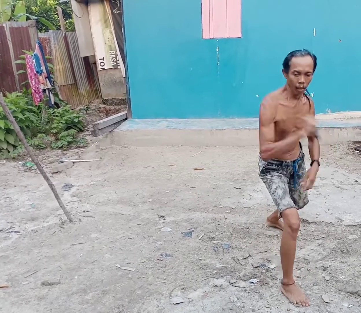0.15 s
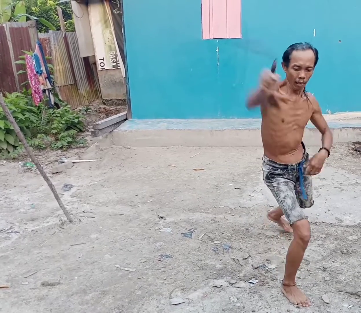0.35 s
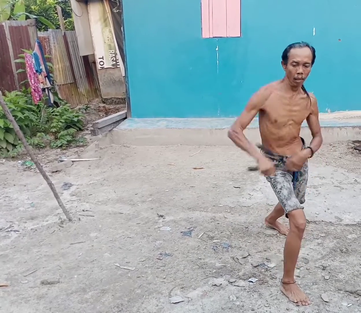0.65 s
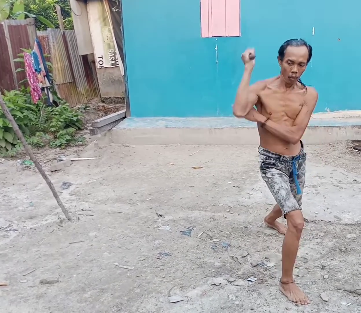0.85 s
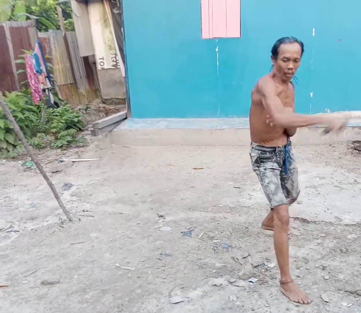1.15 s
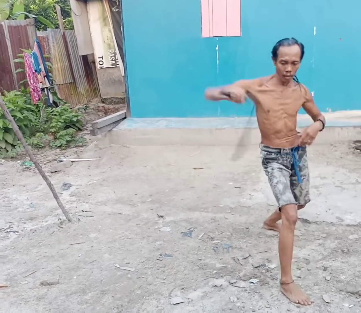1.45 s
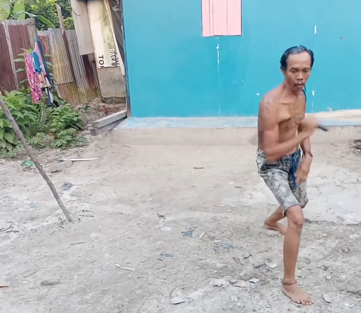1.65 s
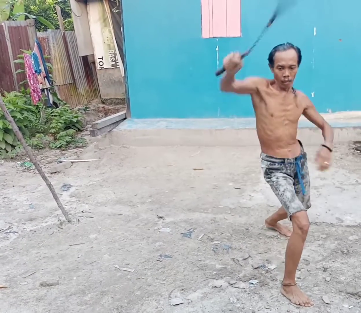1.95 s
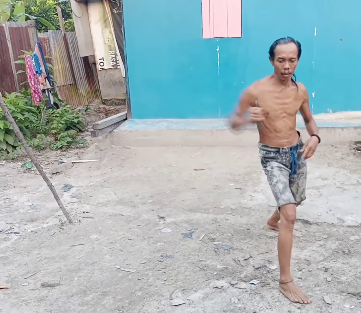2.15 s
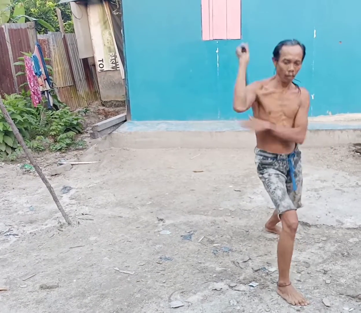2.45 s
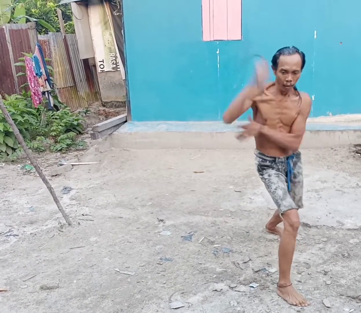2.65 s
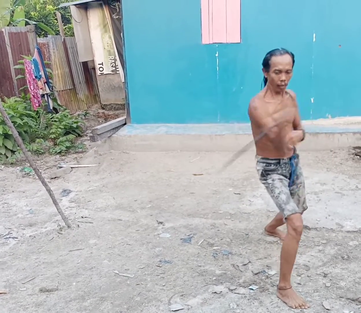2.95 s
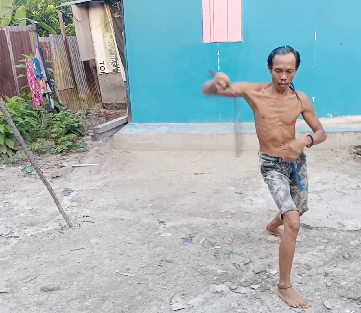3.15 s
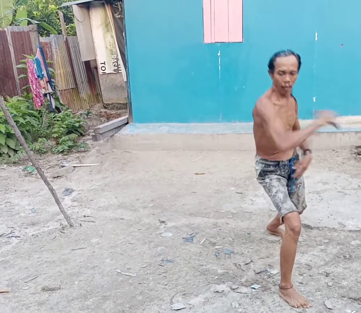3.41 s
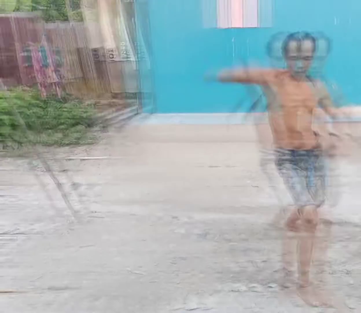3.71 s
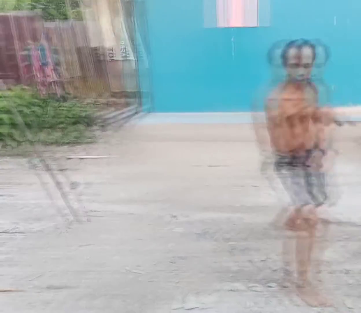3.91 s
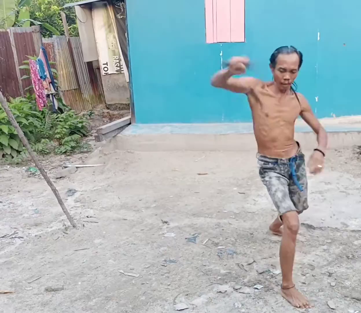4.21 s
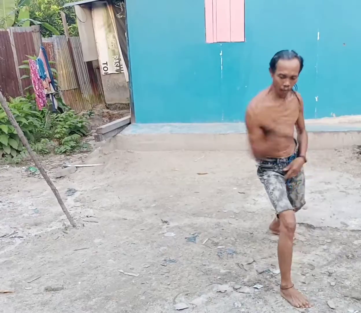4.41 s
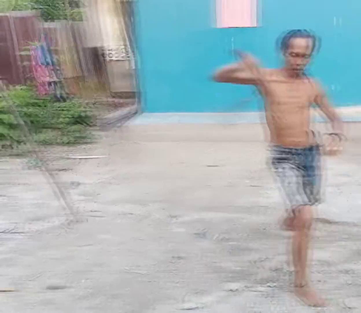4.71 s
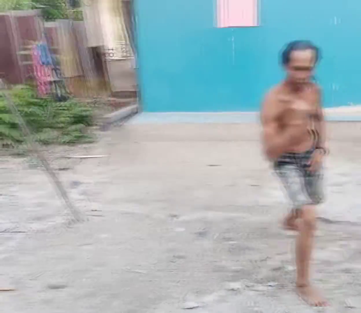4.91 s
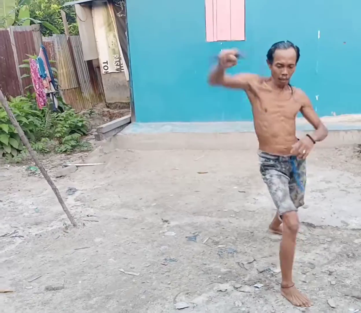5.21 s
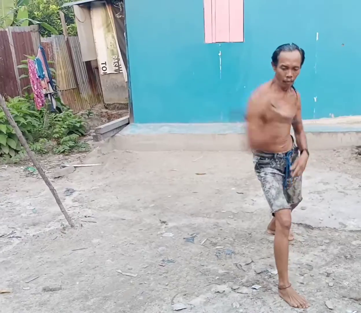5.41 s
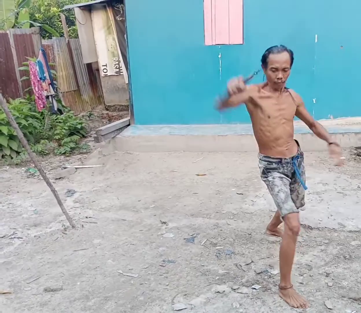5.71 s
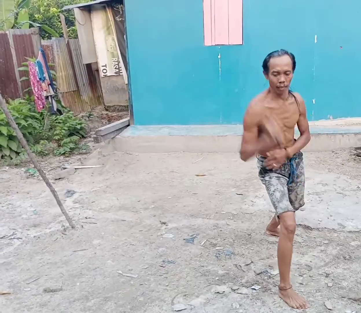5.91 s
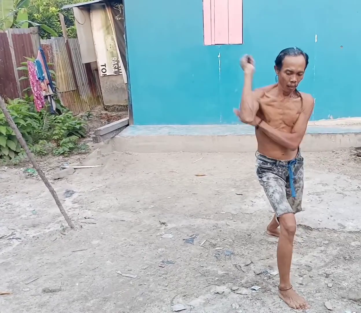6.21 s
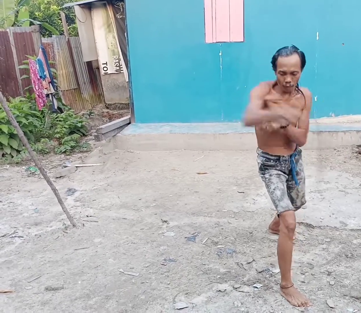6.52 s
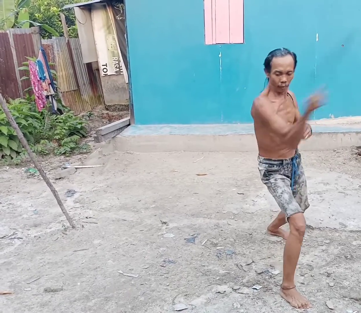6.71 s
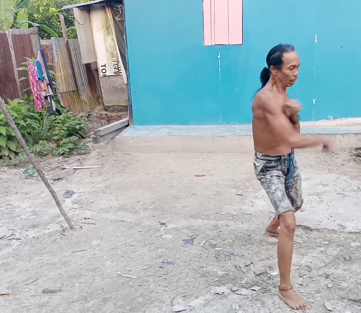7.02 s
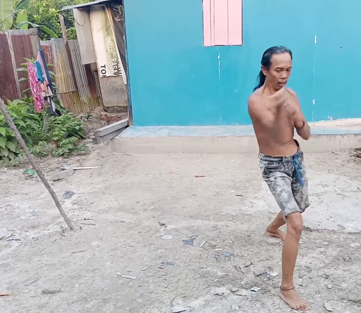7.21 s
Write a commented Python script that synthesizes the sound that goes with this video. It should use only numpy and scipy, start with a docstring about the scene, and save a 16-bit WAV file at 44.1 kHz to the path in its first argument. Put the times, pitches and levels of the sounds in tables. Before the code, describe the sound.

A pair of hollow sticks joined by a chain is swung rapidly in an open yard, a few steps from a mono phone microphone. Short bright rattles of metal links and dry clacks come in irregular bursts, with dull slaps when skin catches a stick. Moderate at first, they grow denser and sharper after four seconds, peak near six, then fade. A nearby wall adds a short diffuse tail over faint traffic hum.

```python
"""Chained sticks swung in a yard

Two hollow sticks joined by a chain are swung in an open yard, a few steps from a mono phone microphone.
Each jerk of the chain is a short run of link collisions that rings the links, their overtones and the sticks.
Pings are dying sines at stick or link pitches, and the sticks slap skin when caught.
A house wall answers with a diffuse tail, and far traffic hums under the hiss of the yard: both are shaped noise."""
import sys
import numpy as np
from scipy import signal
from scipy.fft import rfft, irfft
from scipy.io import wavfile
from scipy.ndimage import uniform_filter1d

SR = 44100
rng = np.random.default_rng(int(sys.argv[2]) if len(sys.argv) > 2 else 0)


def boost(x):
    """Linear amplitude factor 10**(x/20) for a level x in decibels (scalar or array-like)."""
    u = np.asarray(x, float) / 20
    return 10 ** u


def store_wav(level_fs):
    """Save 16-bit WAV to argv[1]."""
    pcm = np.round(np.clip(np.atleast_2d(level_fs), -1, 1) * 32767)
    wavfile.write(sys.argv[1], SR, pcm.T.astype(np.int16))


N = 324576  # length of the scene in samples

# Resonances of the hollow sticks: f/Hz, width/Hz, relative level/dB
STICK_MODES = [(1000, 920, -4.5), (1640, 113, 4), (1750, 910, -6), (1850, 120, -4), (2280, 210, -3.5),
               (2520, 153, -2.5), (2814, 86, -16), (3100, 2900, -4.5), (3350, 130, -1.5), (3603, 150, -1.5),
               (3954, 330, -1), (4190, 320, -7.5)]
# Resonances of the chain links: f/Hz, width/Hz, relative level/dB
LINK_MODES = [(5110, 180, -8.5), (6990, 390, -4.5), (7720, 170, -0.5), (8100, 170, 0), (8260, 114, 0.5),
              (8640, 150, -6.5), (6370, 1700, -13.5), (7360, 270, -4.5), (8100, 970, -8.5),
              (8580, 260, -6.5), (9140, 570, -11)]
# Higher resonances of the links: f/Hz, width/Hz, relative level/dB
OVERTONE_MODES = [(10350, 1300, -1), (11750, 620, 2), (12500, 500, -12), (12100, 4000, -7),
                  (14400, 260, -9), (14800, 1700, 9.5)]


def unit(x):
    """Scales a sound to rms 1."""
    return x / np.sqrt(np.mean(x ** 2) + 1e-20)


def along(points, hz):
    """Reads a curve of (f/Hz, value) points, joined by straight lines on a log frequency axis."""
    f, value = np.transpose(points)
    return np.interp(np.log(hz + 1), np.log(f + 1), value)


def ringing(blows, modes, scatter_db, lean_db=0):
    """Rows of blows ring resonances; the point struck sets each mode's strength and sign anew in each row."""
    f = np.fft.rfftfreq(blows.shape[1], 1 / SR)
    hz, width, db = np.transpose(modes)[:, :, None]

    def peak(peak_width):
        return 1j * f * peak_width / (hz ** 2 - f ** 2 + 1j * f * peak_width)

    # the second, wide peak keeps down what is radiated far from a mode
    shape = boost(db) * peak(width) * peak(width + hz / 2)
    size = (len(blows), len(modes))
    strengths = boost(scatter_db * rng.standard_normal(size) + lean_db)
    strengths *= rng.choice([-1, 1], size)
    return irfft(rfft(blows) * (strengths @ shape), blows.shape[1])


def collisions(shape, per_s, spread_db, scrape):
    """Links hit links in random ticks of uneven size, over a fine scraping made of noise."""
    hits = rng.random(shape) < per_s / SR
    ticks = hits * boost(spread_db * rng.standard_normal(shape)) * rng.choice([-1, 1], shape)
    return unit(ticks) + scrape * rng.standard_normal(shape)


def placed(rows, times):
    """Adds up rows of sound, each starting at its time in seconds."""
    at = np.round(times * SR).astype(int)[:, None] + np.arange(rows.shape[1])
    return np.bincount(at.ravel(), rows.ravel(), N + rows.shape[1])[:N]


def chain():
    """Each jerk sets off a dying run of collisions that rings every part at its own strength."""
    # Strong jerks: t/s, link level/dB, stick level/dB, favoured stick pitch f/Hz, overtone level/dB
    strong_jerks = [(.019,-50,-43.5,3230,-59),(.03,-42,-35.5,2500,-50),(.0442,-38,-43,2450,-56),(.058,-49,-45,2500,-60),(.112,-51,-53,2870,-65),(.2567,-55,-50,2760,-59),(.2778,-39.5,-38,3650,-43),(.3073,-61,-42.5,2380,-68),(.3457,-43.5,-44.5,2200,-55),(.3652,-43,-43,2070,-57),(.3988,-53,-45,2520,-68),(.437,-46.5,-47.5,2450,-71),(.4843,-62,-43.5,2160,-66),(.5518,-46,-44.5,2620,-61),(.6613,-49,-46.5,2600,-56),(.6767,-63,-47,1680,-70),(.7263,-48.5,-44,2500,-67),(.7334,-61,-42.5,2500,-72),(.747,-57,-49,3300,-65),(.759,-42.5,-39.5,3750,-48),(.782,-48,-42,2630,-61),(.7976,-48,-39.5,2320,-60),(.815,-57,-47.5,2500,-64),(.9481,-39.5,-39,2380,-43.5),(.965,-43,-45,3080,-57),(1.0657,-53.5,-50.5,2160,-52),(1.1023,-52.5,-53,1790,-70),(1.1605,-51,-43.5,3250,-64),
                    (1.4537,-53,-61,2370,-64),(1.4748,-51,-47,2280,-72),(1.5079,-48,-46.5,2280,-61),(1.5845,-66,-47,2550,-71),(1.5944,-60,-44,3000,-76),(1.6006,-45,-38,3430,-50),(1.712,-55,-51,2120,-63),(1.762,-47.5,-52,2340,-63),(1.8208,-42.5,-46.5,2770,-66),(1.8406,-41.5,-47,2030,-68),(1.8635,-54,-66,2160,-70),(1.9595,-53,-46.5,2800,-72),(2.0391,-54,-46,2520,-73),(2.1165,-53,-56,1750,-53),(2.1371,-40.5,-50,1630,-56),(2.3418,-53,-50,2580,-66),(2.3526,-49,-44.5,2240,-63),(2.374,-44,-40.5,2360,-58),(2.3856,-45,-39,2050,-57),(2.3948,-35.5,-34.5,2650,-54),(2.4121,-48,-42,2950,-61),(2.4228,-40,-39,2550,-48),(2.534,-44.5,-51,1970,-56),(2.5627,-43.5,-42.5,2680,-65),(2.5763,-43,-47,2100,-65),(2.629,-52,-52,2170,-61),(2.6849,-54.5,-73,2140,-50),(2.7678,-50,-45,3410,-55),(2.7791,-42,-39,3270,-58),(2.8033,-54,-48,3100,-68),
                    (3.2143,-81,-50,1610,-78),(3.24,-77,-47,1640,-78),(3.2706,-44,-45.5,2950,-60),(3.3354,-48,-53,1850,-56),(3.4058,-47.5,-45.5,2500,-71),(3.4522,-38.5,-44,2820,-60),(3.469,-45,-45,2380,-61),(3.4804,-48,-52,3010,-67),(3.512,-53,-41,2270,-57),(3.524,-36,-35.5,3020,-48),(3.5479,-41.5,-37.5,2700,-45),(3.643,-54,-69,2860,-63),(3.7145,-56,-42.5,3440,-62),(3.8288,-44,-50.5,3250,-58),(3.944,-57,-42,1860,-72),(3.979,-71,-49,2200,-73),(4.0089,-51.5,-51,2300,-63),(4.0668,-56,-53,3130,-58),(4.081,-45.5,-41.5,2200,-57),(4.0998,-42.5,-39,3470,-58),(4.124,-44,-40,3680,-56),(4.1747,-54,-44,3410,-64),(4.207,-45.5,-40.5,2640,-60),(4.277,-68,-48.5,3100,-69),(4.3534,-49,-46,3350,-60),(4.422,-49,-64,3560,-74),(4.4543,-56,-53,1990,-65),(4.4848,-44.5,-48,2440,-59),
                    (4.5672,-40,-44,3790,-55),(4.578,-38,-40.5,3250,-53),(4.5883,-31.5,-34,3600,-41),(4.607,-43,-43,3540,-57),(4.6257,-38,-45,2680,-48),(4.6405,-53,-59,3400,-60),(4.78,-74,-42,2830,-71),(4.7959,-74,-44,1640,-78),(4.808,-75,-44,1620,-74),(4.823,-24.5,-29,2600,-32),(4.842,-35.5,-33,1690,-38),(4.88,-45,-46,3200,-59),(4.9205,-45.5,-52,1810,-63),(4.96,-70,-53,1500,-80),(4.9882,-54,-65,2560,-75),(5.0455,-43,-44.5,1750,-65),(5.0595,-41,-39,2810,-54),(5.0735,-48,-46,2600,-59),(5.087,-36,-34,3240,-41),(5.1,-36,-37.5,1750,-55),(5.125,-47,-41,3280,-55),(5.146,-49,-50,3470,-68),(5.1885,-53,-47,3180,-71),(5.23,-53,-48,2280,-75),(5.281,-47,-49.5,2360,-55),(5.3622,-54,-45,3220,-65),(5.3864,-47.5,-46,3460,-54),(5.499,-57,-45,2530,-72),
                    (5.5524,-39,-40.5,3180,-64),(5.5808,-47,-46,2330,-62),(5.5928,-34.5,-48,3060,-50),(5.5993,-32.5,-35,3670,-52),(5.6158,-38,-30,3500,-40),(5.708,-50,-49.5,3400,-70),(5.747,-57,-46,2780,-67),(5.8477,-68,-45,3550,-70),(5.8976,-50,-52,2660,-59),(5.9367,-44,-44.5,3200,-70),(5.9664,-58,-50,2640,-74),(5.9884,-48,-49,2160,-77),(6.0532,-40.5,-37.5,3950,-60),(6.0746,-27,-45,2400,-37),(6.0821,-19,-27.5,2730,-29),(6.0938,-40,-38,2850,-45),(6.113,-49,-37.5,2920,-50),(6.139,-49,-40.5,2360,-63),(6.156,-47,-38.5,2800,-71),(6.1884,-38,-42,3030,-52),(6.1962,-48,-40.5,2760,-50),(6.2383,-48,-49,3250,-55),(6.2937,-41,-57,2390,-44),(6.3103,-49,-54,3360,-65),(6.3415,-46.5,-68,2320,-42.5),(6.4067,-52,-61,2870,-49),(6.4864,-47,-45.5,2410,-48),(6.5013,-43,-43.5,2370,-51),(6.5141,-59,-40,3120,-66),(6.5441,-55,-47,3000,-72),(6.594,-52,-49.5,2790,-63),(6.6293,-59,-52.5,2670,-63),(6.877,-55.5,-55,3370,-79),(7.02,-61,-75,2080,-57),(7.16,-46,-59,2170,-71),(7.1983,-56,-47.5,2520,-74)]
    jerks = np.vstack([strong_jerks, small_jerks()])
    s, links_db, stick_db, stick_hz, overtone_db = jerks.T[:, :, None]

    t = np.arange(8192) / SR
    rattle_t60_s, rise_s = 0.11, 0.00066
    run = np.ones_like(s) * boost(-60 * t / rattle_t60_s) * (1 - np.exp(-t / rise_s)) * (t < .16)
    run *= 1 + 0.58 * np.exp(-t / 0.002)  # the first contact is the hardest
    blows = run * collisions(run.shape, per_s=3000, spread_db=2.5, scrape=0.77)

    # stick modes far from the pitch that the jerk favours are hardly stirred
    octaves_off = np.log2(np.transpose(STICK_MODES)[0] / stick_hz)
    favoured_db = np.maximum(-30 * octaves_off ** 2, -14)
    parts = (
        (STICK_MODES, stick_db, favoured_db),
        (LINK_MODES, links_db, 0),
        (OVERTONE_MODES, overtone_db, 0),
    )
    sound = 0
    for modes, db, lean_db in parts:
        part = ringing(blows, modes, 2.24, lean_db)
        # the levels are the rms of the first 8 ms
        start = np.sqrt(np.mean(part[:, :SR // 125] ** 2, axis=1, keepdims=True))
        sound += boost(db) * part / start
    return placed(sound, s[:, 0])


def small_jerks():
    """Rows like those of the strong jerks, at random moments, stronger when the chain is livelier."""
    count, scatter_db = 150, 3.5
    s = (np.arange(count) + rng.random(count)) * N / SR / count
    links, stick, overtones, pitch = rng.standard_normal((count, 4)).T
    links_db = trembling_db(s) - 9 + scatter_db * links
    stick_db = trembling_db(s) - 3 + scatter_db * stick
    overtone_db = links_db - 15 + scatter_db * overtones
    stick_hz = 2500 * 2 ** (0.29 * pitch)  # scattered by 0.29 octaves
    return np.transpose([s, links_db, stick_db, stick_hz, overtone_db])


def trembling_db(s):
    """How lively the chain is between strong jerks, in dB, at the given times in seconds."""
    # Liveliness of the chain, to which each user adds its own offset: t/s, level/dB
    liveliness = [(0.0, -46), (0.31, -54.5), (0.47, -51), (1.29, -57.5), (1.95, -52), (2.33, -57.5),
                  (2.6, -52), (2.83, -63.5), (3.11, -54.5), (3.44, -52), (3.79, -56.5), (4.08, -51),
                  (4.86, -56), (4.98, -50.5), (5.64, -53), (6.17, -48.5), (6.82, -61.5), (7.36, -58.5)]
    return np.interp(s, *np.transpose(liveliness))


def tremble():
    """Loose links touch lightly all through the swing; the chain's turning keeps changing which modes ring."""
    window, hop = 4096, 2048  # samples
    starts = np.arange(0, N / SR, hop / SR)
    blows = collisions((len(starts), 2 * window), per_s=2500, spread_db=8.5, scrape=1.4)
    # overlapping windows blend one set of modes into the next
    blows[:, :window] *= np.sqrt(np.hanning(window))
    blows[:, window:] = 0  # room for the ringing to die
    light = ringing(blows, LINK_MODES, 0.78)
    light += boost(2.5) * ringing(blows, STICK_MODES, 4)
    light += boost(-19) * ringing(blows, OVERTONE_MODES, 2.6)
    level_db = trembling_db(np.arange(N) / SR) - 5.5
    return boost(level_db) * unit(placed(light, starts))


def slaps():
    """A short knock of the stick, a dying sine, and a dull puff of ringing noise where skin gives way."""
    # Stick against hand or ribs: t/s, knock level before rise and decay/dB, knock f/Hz, puff over knock/dB
    skin_hits = [(.018,-51,435,3),(.287,-46,1080,-2),(.364,-42.5,694,6.5),(.793,-44,1000,6),(1.161,-51,1186,0),(1.475,-44.5,750,-2),(1.756,-51,440,5),(2.02,-47.5,720,-1),(2.381,-40.5,637,-4),(2.536,-52,445,12),(2.769,-42.5,665,-13),(3.336,-47,1100,-2),(3.525,-50.5,890,13),(3.714,-51.5,659,9),(3.928,-37.5,1134,-17),(4.067,-48.5,662,2),(4.168,-48,710,0.1),(4.572,-44.5,703,4),(4.825,-38.5,728,-11),(5.104,-39.5,662,5),(5.607,-44,727,11.5),(5.991,-47,408,-2),(6.078,-41,1004,-7),(6.18,-42,1157,5),(6.29,-38.5,1160,14.5),(6.576,-46,1030,5)]
    # Resonances of the skin: f/Hz, width/Hz, relative level/dB
    skin_modes = [(437, 470, -3), (835, 1060, 2)]
    s, db, hz, puff_db = np.transpose(skin_hits)[:, :, None]
    t = np.arange(2048) / SR
    knock_t60_s, puff_t60_s, rise_s = 0.06, 0.025, 0.00033
    knock = np.sin(2 * np.pi * hz * t) * boost(-60 * t / knock_t60_s)
    burst = rng.standard_normal(knock.shape) * boost(-60 * t / puff_t60_s)
    puff = ringing(burst, skin_modes, 1.5)
    puff /= np.abs(puff).max(axis=1, keepdims=True)
    rise = 1 - np.exp(-t / rise_s)
    return placed(boost(db) * rise * (knock + boost(puff_db) * puff), s[:, 0])


def pings():
    """Dying sines at stick or link pitches, single or several at once, often within a jerk."""
    # Pings: t/s, level before rise and decay/dB, f/Hz, time to die by 60 dB t60/s
    ping_rows = [(3.2142,-40.5,1680,0.14),(4.0841,-30,2380,.03),(4.177,-25.5,3420,0.027),(4.799,-33,1660,.05),(4.811,-25,1640,.06),(4.8245,-19.5,1900,0.065),(4.8446,-23.5,1660,0.054),(5.104,-31,1726,.03),(5.1896,-41,3310,.06),(5.965,-38.5,2670,.08),(6.083,-23,2537,.07),(6.0832,-23.5,5090,.09),(6.0834,-28,11700,.03),(6.11,-33,5130,0.072)]
    s, db, hz, t60 = np.transpose(ping_rows)[:, :, None]
    t = np.arange(4096) / SR
    rise = 1 - np.exp(-t / 0.0015)
    tone = np.sin(2 * np.pi * hz * t)
    return placed(boost(db - 60 * t / t60) * rise * tone, s[:, 0])


def walls(x):
    """The yard's short diffuse answer, each frequency dying at its own speed, with random tails."""
    # Echo of wall and fences: f/Hz, time to die by 60 dB t60/s
    dying_times = [(500, 0.3), (3000, 0.19), (12000, 0.15)]
    step, tail_length = 4096, 16384  # samples
    pieces = np.pad(x, (0, -N % step)).reshape(-1, step)
    # every piece of sound gets a fresh tail of dying noise
    noise = rng.standard_normal((len(pieces), tail_length))
    hz, t, z = signal.stft(noise, SR, nperseg=256)
    decay = boost(-60 * t / along(dying_times, hz)[:, None])
    tails = signal.istft(z * decay, SR, nperseg=256)[1]
    tails /= np.linalg.norm(tails, axis=1, keepdims=True)
    starts = np.arange(len(pieces)) * step / SR
    return placed(signal.fftconvolve(pieces, tails, axes=1), starts + .007)  # 7 ms late


def yard():
    """Far traffic and air: steady noise with a coloured spectrum, in faint patches."""
    # Colour of the background: f/Hz, relative level per Hz/dB
    colour = [(15, -50), (25, -41), (74, 5), (114, 1), (384, -5.5), (476, -9.5), (911, -13.5), (1650, -14),
              (2110, -17), (3620, -20.5), (4300, -37), (5570, -34), (8140, -27.5), (9900, -25),
              (10500, -39), (14800, -44), (15700, -36)]
    hz, t, z = signal.stft(rng.standard_normal(N + SR), SR, nperseg=2048)
    # smooth random levels across frequency, then across time
    patches = uniform_filter1d(rng.standard_normal(z.shape), size=15, axis=0)
    patches = uniform_filter1d(patches, size=4, axis=1)
    z = z * boost(along(colour, hz)[:, None] + 1.52 * unit(patches))
    noise = signal.istft(z, SR, nperseg=2048)[1][:N]
    return boost(-52.5) * unit(noise)


def scene():
    """One microphone hears every source and feeds both channels."""
    near = chain() + slaps() + pings() + tremble()
    mono = near + boost(-8.0) * walls(near) + yard()
    return np.tile(mono, (2, 1))


def band_limit(x):
    """A steep low-pass at the top of the band."""
    return signal.sosfilt(signal.butter(12, 16330, fs=SR, output="sos"), x)


def record(dry):
    """The top treble is weakened, and a steep low-pass removes all from 15.8 kHz up."""
    hz = np.fft.rfftfreq(N, 1 / SR)
    slope = boost(-6 * np.clip(hz / 1000 - 14.8, 0, None))  # 6 dB per kHz above 14.8 kHz
    low_pass_hz = 15800
    mix = irfft(rfft(dry) * slope * (hz < low_pass_hz), N)
    return band_limit(mix)


dry = scene()
out = record(dry)
store_wav(out)
```